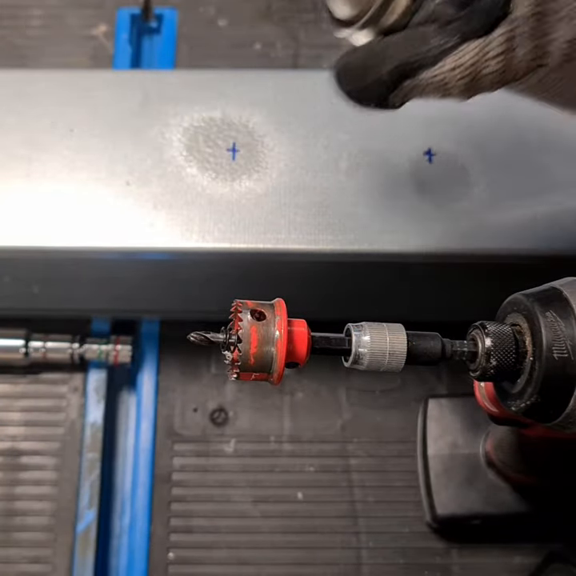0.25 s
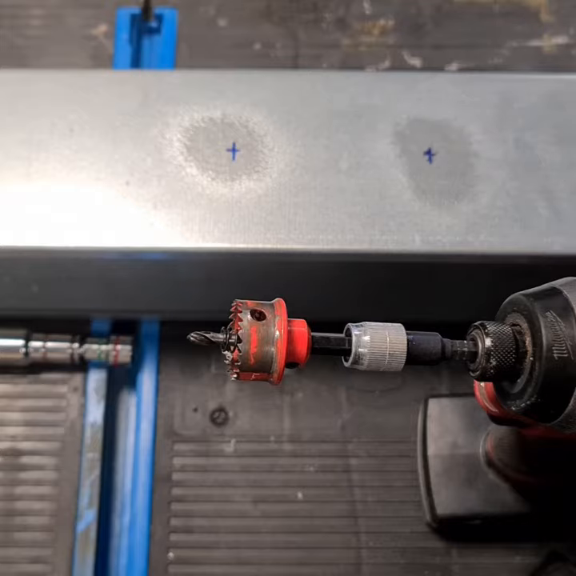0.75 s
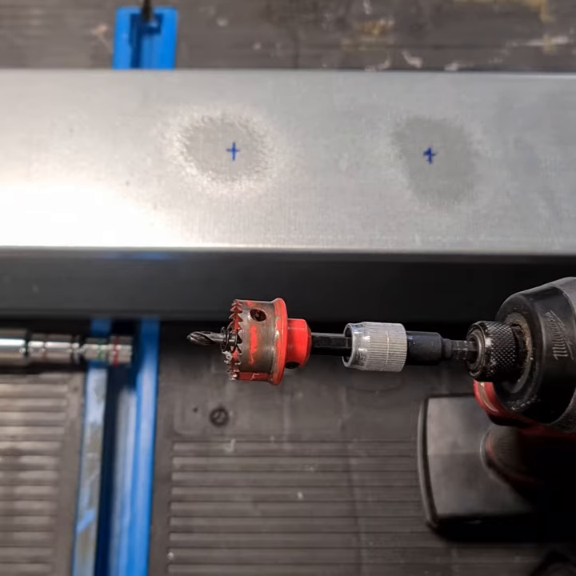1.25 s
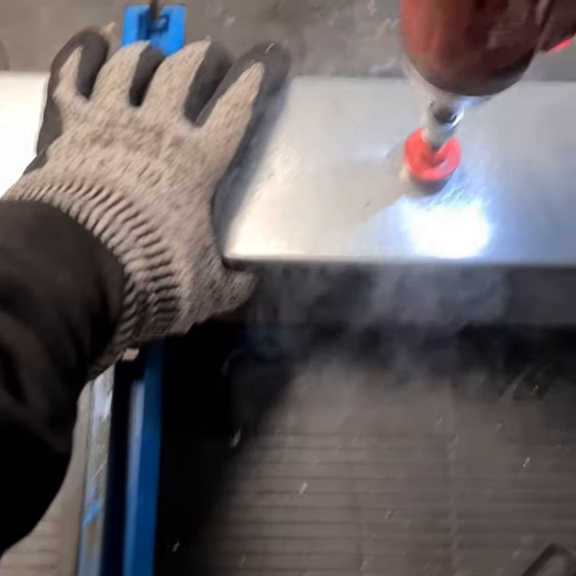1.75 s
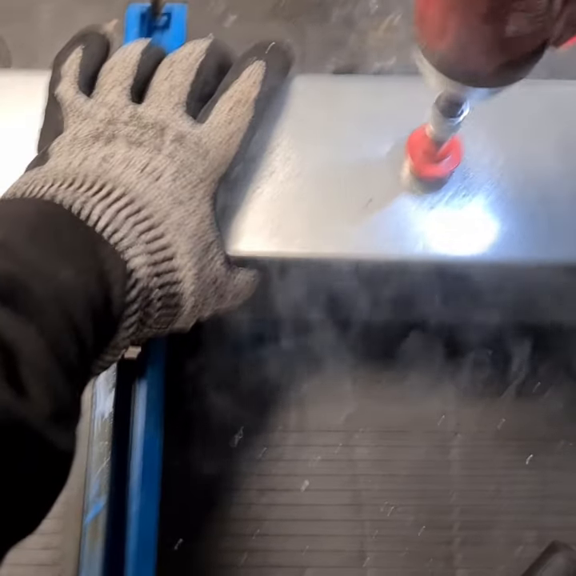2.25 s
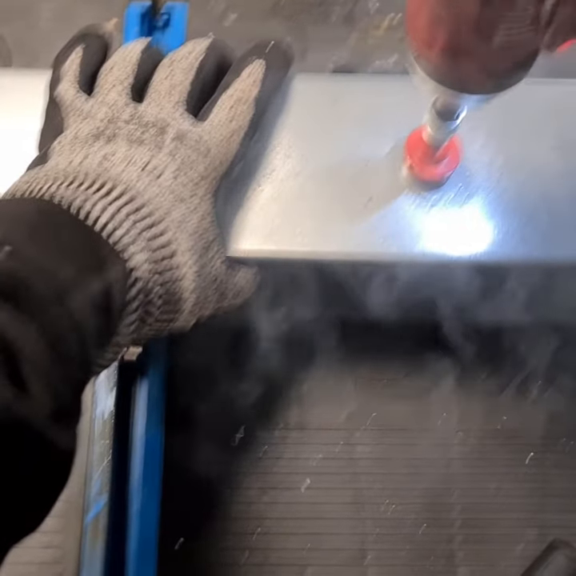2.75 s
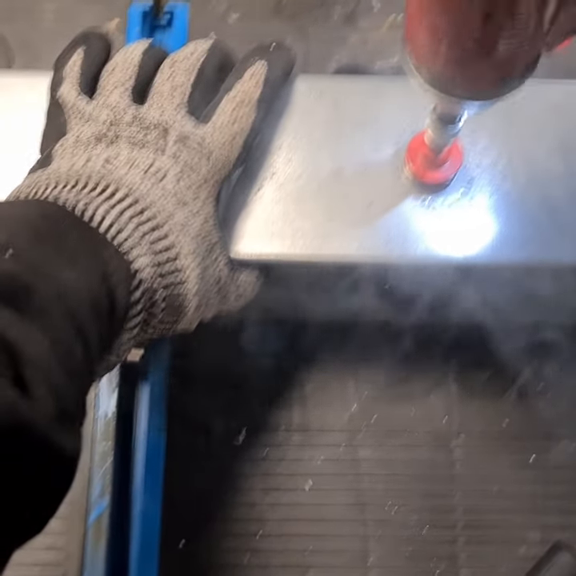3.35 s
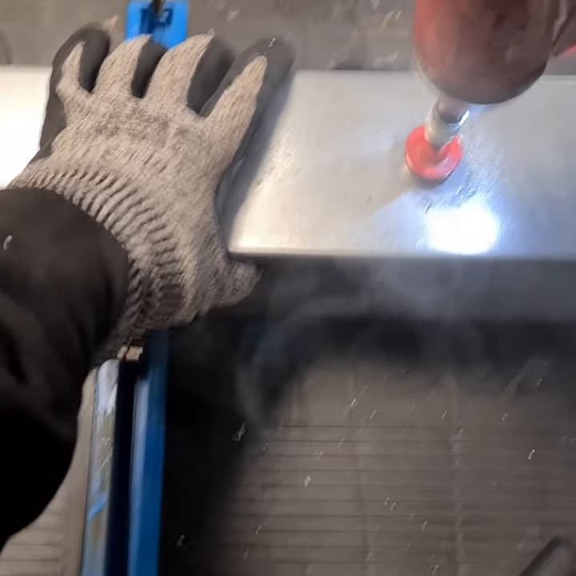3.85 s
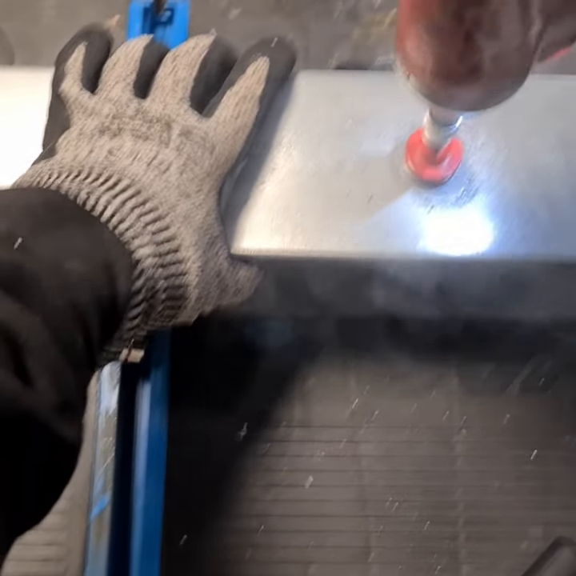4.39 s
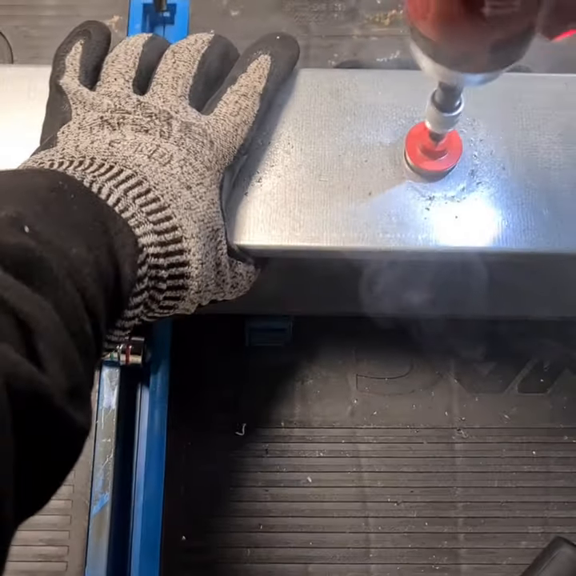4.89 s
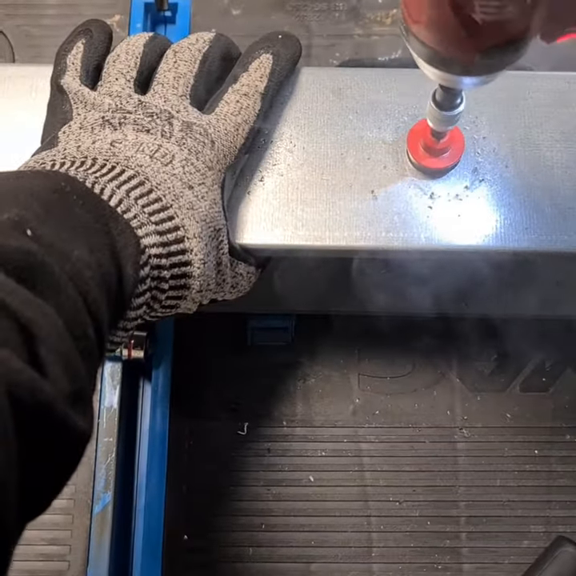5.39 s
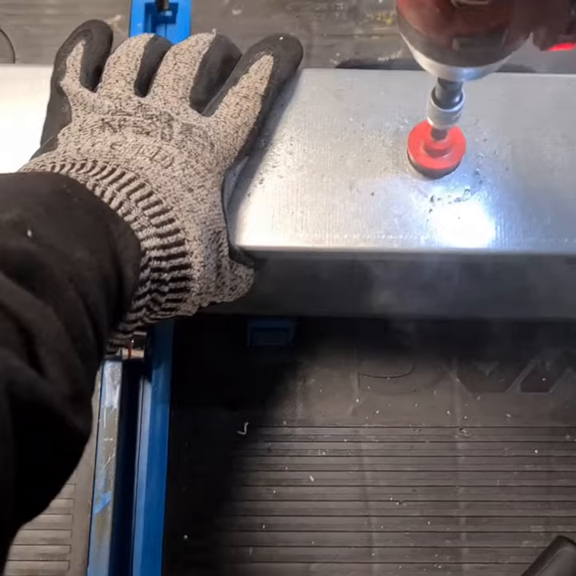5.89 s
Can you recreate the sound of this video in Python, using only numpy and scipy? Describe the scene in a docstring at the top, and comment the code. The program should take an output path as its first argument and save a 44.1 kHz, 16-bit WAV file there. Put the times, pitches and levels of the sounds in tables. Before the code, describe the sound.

A quiet workshop holds a soft low rumble and very faint hiss. From 0.1 to 0.25 seconds, then 0.65 to 0.8, a spray can gives two sharp, airy puffs, each setting thin steel shimmering briefly. Near-quiet follows, with a tiny bright rustle at 1.5. At about 1.73 an impact driver and hole saw burst in loudly: some fifty rattling blows a second, hollow steel booming, coarse scraping and piercing chip hiss. At 3.1 the brightest screech eases slightly while hammering continues. Around 4.72 the blows stop with a low thump, leaving rougher, uneven grinding with wavering metallic tones. The teeth lift briefly at 5.25, bite again, then lift longer from 5.6 to 5.8. Hammering returns at 5.8, slower, near forty blows a second, with strong scraping until the abrupt end at about 6.1. The microphone is close, with wide stereo.

```python
"""In a quiet workshop, two short puffs of cutting oil from a spray can land on steel trunking: jets of
shaped noise that set sharp resonances ringing. An impact driver then turns a hole saw in the sheet:
random tooth catches excite the wall modes, scrape and chips are dense coloured clicks, and the hammer
strikes some forty to fifty times a second in two runs, each blow a burst of band noise."""
import sys
import numpy as np
from scipy import signal
from scipy.fft import rfft, irfft, next_fast_len
from scipy.io import wavfile

SR = 44100
rng = np.random.default_rng(int(sys.argv[2]) if len(sys.argv) > 2 else 0)


def store_wav(level_fs):
    """Save 16-bit WAV to argv[1]."""
    pcm = np.round(np.clip(np.atleast_2d(level_fs), -1, 1) * 32767)
    wavfile.write(sys.argv[1], SR, pcm.T.astype(np.int16))


def invert_db(level):
    """Linear amplitude ratio for a level in decibels (20 dB per decade), elementwise."""
    return 10 ** (np.asarray(level, dtype=float) / 20)


N = 270333

# Stereo balance of most sources. Each row: frequency in Hz, left minus right in dB.
PAN = [(60, 3), (130, -4), (290, 1.5), (640, -5), (1410, 0), (3100, -2), (6820, 1), (15000, -8.5)]
# Two wall modes heard as tones. Each row: frequency in Hz, wavers a second.
SINGING_MODES = [(1030, 6), (1842, 14)]
EVEN_PAN = [(20, 0), (SR, 0)]


def rms_one(x):
    """Normalisation: scale to a root mean square of 1."""
    return x / np.sqrt(np.mean(x ** 2) + 1e-20)


def in_time(rows):
    """Linear interpolation: columns of a table against time, one value a sample."""
    s, *columns = np.transpose(rows)
    return [np.interp(np.arange(N) / SR, s, c) for c in columns]


def at_hz(points, hz):
    """Spectral interpolation along a logarithmic frequency axis."""
    hz_points, values = np.transpose(points)
    return np.interp(np.log(hz + 1), np.log(hz_points + 1), values)


def drift(rate):
    """Slow random modulation: low-passed noise of spread 1, drawn once in 40 samples."""
    r = np.exp(-80 * np.pi * rate / SR)
    noise = rng.standard_normal(N // 40 + 2002)
    slow = signal.lfilter([1], [1, -2 * r, r * r], noise)[2000:]
    return np.interp(np.arange(N) / 40, np.arange(len(slow)), rms_one(slow))


def resonate(x, hz, width_hz):
    """Damped resonance: two poles, gain 1 at the peak, narrower modes ringing longer."""
    r = np.exp(-np.pi * width_hz / SR)
    poles = [1, -2 * r * np.cos(2 * np.pi * hz / SR), r * r]
    return signal.lfilter([(1 - r * r) / 2, 0, (r * r - 1) / 2], poles, x)


def ring_modes(drive, modes):
    """Modal superposition: one force drives every mode, with alternating sign."""
    return sum(invert_db(db) * (-1) ** k * resonate(drive, hz, width_hz)
               for k, (hz, width_hz, db) in enumerate(modes))


def grains(per_s, spread_db):
    """Shot noise: clicks at random instants with uneven sizes, rms 1."""
    sizes = invert_db(spread_db * np.minimum(rng.exponential(1, N), 5)) * rng.choice([-1, 1], N)
    return rms_one(sizes * (rng.random(N) < per_s / SR) + 1e-9)


def spread(shared, apart, spectrum, pan):
    """Partial coherence: colour a source, place it, and share part of it between left and right."""
    # Each row: frequency in Hz, likeness of left and right (below 0 is taken as 0).
    likeness = [(60, 0.89), (130, 0.77), (290, 0.99), (640, 0.88), (1410, -0.15), (3100, 0.61),
                (6820, -0.01), (15000, -0.02)]
    left_lead_s = 4.5e-05
    size = next_fast_len(N)
    hz = np.arange(size // 2 + 1) * SR / size
    alike = np.clip(at_hz(likeness, hz), 0, 1)
    common = np.sqrt(1 + alike) * rfft(shared, size)
    opposed = np.sqrt(1 - alike) * rfft(apart, size) * [[1], [-1]]
    gain = invert_db(at_hz(spectrum, hz) + at_hz(pan, hz) * [[.5], [-.5]])
    lead = np.exp(2j * np.pi * hz * left_lead_s * [[1], [0]])
    return rms_one(irfft((common + opposed) * gain * lead, size)[:, :N])


def spread_noise(spectrum, pan):
    """Broadband noise: two independent draws coloured and placed in stereo, rms 1."""
    return spread(*rng.standard_normal((2, N)), spectrum, pan)


def workshop():
    """Background noise: a low rumble and faint hiss of random noise, with a few wavering sinusoids."""
    # Rumble. Each row: frequency in Hz, relative density in dB per Hz.
    room_tone = [(12, -30), (20, -7), (50, -8), (153, -8), (185, -18.5), (300, -22.5), (420, -31),
                 (900, -35), (3200, -37.5), (5100, -45), (15600, -56)]
    # Far machinery. Each row: frequency in Hz, mean level in dB.
    hum = [(70.0, -75), (107.7, -72), (150.7, -72), (296.1, -77)]
    rumble = invert_db(-65.5 + 1.2 * drift(2.8)) * spread_noise(room_tone, EVEN_PAN)
    hiss = invert_db(-84) * spread_noise([(2500, -30), (5000, 0), (11000, -1), (16000, -5)], EVEN_PAN)
    s = np.arange(N) / SR
    hums = sum(np.sqrt(2) * invert_db(db + 1.3 * drift(7)) * np.sin(2 * np.pi * hz * s) for hz, db in hum)
    return rumble + hiss + hums


def jet_level_db():
    """Valve envelope: each puff rises fast, sags, and drops steeply when the valve shuts."""
    # Each row: valve opens in seconds, valve shuts in seconds, jet level before rise and sag in dB.
    puffs = [(0.083, 0.251, -31), (0.643, 0.796, -30.5)]
    rise_s, sag_db_per_s, stop_db_per_s, floor_db = .013, 31, 470, -110
    level = np.full(N, float(floor_db))
    for opens, shuts, db in puffs:
        since = np.arange(N) / SR - opens
        rise = -60 * np.exp(-np.abs(since) / rise_s)
        stop = stop_db_per_s * np.maximum(since + opens - shuts, 0)
        puff = db + rise - sag_db_per_s * since - stop
        level = np.maximum(level, np.where(since > 0, puff, floor_db))
    return level


def spray():
    """Jet turbulence: smooth bright noise excites thin steel resonances and a short dull room tail."""
    # Each row: frequency in Hz, relative density in dB per Hz.
    jet_spectrum = [(150, -42), (250, -17), (353, -9), (508, -3), (931, -13), (1030, -5.5), (1340, -7.5),
                    (1680, 0.5), (2490, -12), (3350, -3), (4490, -9), (9130, -4), (11800, -2),
                    (13400, -4.5), (15600, -4)]
    # Each row: frequency in Hz, left minus right in dB.
    jet_pan = [(60, -1.5), (240, -7), (950, 2.5), (3770, -0.5), (15000, -2.5)]
    # Thin steel. Each row: frequency in Hz, relative level in dB, 60 dB decay in seconds before the cap.
    steel_ring = [(1028, -10, 0.66), (2100, -1, 0.39), (2460, 3, 0.64), (3095, -5, 1.8), (3316, -0.5, 0.85),
                  (3542, -7, 0.93), (3600, -5, 0.59), (4624, -8, 1.2), (5216, -14, 5.0), (5819, -6, 0.46),
                  (6062, -10, 0.8), (6702, -13, 0.91), (7660, -10, 5.0), (7946, -9, 0.33), (8533, -8, 0.34),
                  (8678, -23, 1.1), (9292, -18, 0.79), (9900, -16, 2.1), (10910, -19, 1.2),
                  (11080, -16, 0.68), (11250, -10, 0.28), (11770, -12, 0.46)]
    ring_db, decay_most_s, tail_db, tail_t60_s = 8, 1.3, -19, .5
    jet_db = jet_level_db()
    jet = invert_db(jet_db + 1.3 * drift(30)) * spread_noise(jet_spectrum, jet_pan)
    ring = 0
    for hz, db, t60 in steel_ring:
        width_hz = np.log(1000) / (np.pi * min(t60, decay_most_s))
        ring = ring + invert_db(db) * resonate(jet, hz, width_hz)
    # the jet energy feeds the tail and leaks away exponentially
    keep = invert_db(-120 / (tail_t60_s * SR))
    energy = signal.lfilter([1 - keep], [1, -keep], invert_db(2 * jet_db))
    tail_spectrum = [(300, -8), (1200, -8), (3500, 1), (8000, -5), (16000, -16)]
    tail = np.sqrt(energy) * spread_noise(tail_spectrum, jet_pan)
    return jet + invert_db(ring_db) * ring + invert_db(tail_db) * tail


def decaying_swell(s, db, t60, rise_s):
    """Exponential decay: a linear onset, then a fall of 60 dB in each t60."""
    since = np.arange(N) / SR - s
    return invert_db(db - 60 * np.maximum(since, 0) / t60) * np.clip(since / rise_s, 0, 1)


def tick():
    """Resonant noise: a faint bright rustle before the cut, with two broad spectral peaks."""
    # One row: start in seconds, level in dB, 60 dB decay in seconds.
    rustle = (1.512, -70, .3)
    white = rng.standard_normal((2, N))
    bright = resonate(white, 6100, 600) + resonate(white, 8000, 500) + .15 * white
    return decaying_swell(*rustle, .015) * rms_one(bright)


def level_db(layer):
    """Contact excitation: stage level plus a share of feed pressure, fading with the teeth off the steel."""
    # Each key: a layer; its values: share of the pressure swing, fade in dB per second off the steel,
    # level in dB in each of the four stages.
    layers = { "wide": (0.22, 124, [-23, -22, -19, -20]), "side": (0.69, 177, [-28.5, -26.5, -26.5, -27]),
              "scrape": (0.62, 190, [-25, -23, -26, -21.5]), "chips": (1.05, 260, [-23, -24.5, -31.5, -25]),
              "cup": (0.96, 410, [-23, -31, -32, -30]), "upper": (0.56, 200, [-29, -29.5, -32, -25.5]),
              "low tone": (0.3, 50, [-44.5, -42, -42.5, -44]),
              "high tone": (0.3, 103, [-41, -35.5, -42.5, -34.5]),
              "hammer": (0.3, 100, [-20.5, -21.5, -21.5, -19.5]), }
    # Times in seconds at which the layer levels step to a new stage at once.
    stages_s = [3.135, 4.718, 5.815]
    # Feed pressure. Each row: time in seconds, swing in dB before each layer takes its share.
    pressure = [(1.73, 1), (2.0, -2), (2.35, 0), (3.1, 1), (3.2, -2), (3.45, 0), (4.1, 0), (4.27, 1.5),
                (4.6, .5), (4.71, 2), (4.73, 2), (4.86, -1), (4.94, 4.5), (5.0, -6.5), (5.05, -2.5),
                (5.14, -3), (5.23, -2), (5.39, 1), (5.55, 5.5), (5.6, 0), (5.82, 5), (5.835, -1), (5.85, 2),
                (6.1, -1), (6.13, 1)]
    # Teeth off the steel. Each row: leave in seconds, touch again in seconds.
    lifts = [(5.25, 5.322), (5.594, 5.797)]
    fade_most_s, retouch_s = 0.14, 0.023   # the fade levels off; the teeth bite again
    share, fade_db_per_s, stages_db = layers[layer]
    s, (pressure_db,) = np.arange(N) / SR, in_time(pressure)
    off_s = sum(np.clip(s - leave, 0, fade_most_s) * np.clip(1 - (s - touch) / retouch_s, 0, 1)
                for leave, touch in lifts)
    stage_db = np.array(stages_db)[np.searchsorted(stages_s, s)]
    return stage_db + share * pressure_db - fade_db_per_s * off_s


def walls(modes, effort_db, per_s, spread_db):
    """Modal excitation: tooth catches drive all wall modes at once, and narrow modes ring on."""
    catches = [invert_db(effort_db) * grains(per_s, spread_db) for part in range(2)]
    rung = [ring_modes(c, modes) for c in catches]
    return spread(*rung, [(20, 0), (SR, 0)], PAN) * np.sqrt(np.mean(invert_db(2 * effort_db)))


def blow_samples():
    """Phase accumulation: a blow falls as the summed rate passes a whole number, a little uneven."""
    # Hammer runs. Each row of a run: time in seconds, blows a second.
    blow_rate = [
        [(1.7476, 42.88), (2.22, 49.15), (2.45, 47.87), (2.95, 54.38), (3.2, 53.07), (3.4, 49.21),
         (3.75, 48.38), (3.9, 48.7), (4.02, 46.46), (4.2, 53.6), (4.35, 53.8), (4.5, 52.82), (4.71, 52.8)],
        [(5.8165, 39.3), (6.127, 38.7)],
    ]
    jitter_s = 0.0005
    s, at = np.arange(N) / SR, []
    for run in blow_rate:
        running = (s >= run[0][0]) * (s <= run[-1][0])
        struck = np.cumsum(in_time(run)[0] * running) / SR
        at.append(np.flatnonzero(np.diff(np.ceil(struck))))
    at = np.concatenate(at)
    return (at + jitter_s * SR * rng.standard_normal(len(at))).astype(int)


def jolt_db(at):
    """Impulsive loading: each blow drives the teeth deeper, and the extra force dies exponentially."""
    rise_db, fade_s = 5, 0.0056
    clicks = np.zeros(N)
    clicks[at] = rise_db
    return signal.lfilter([1], [1, -np.exp(-1 / (fade_s * SR))], clicks + 1e-18)


def trunking(at, bite):
    """Plate resonance: catches and blows excite the wide walls and the side walls."""
    # Wide walls. Each row: frequency in Hz, width in Hz, relative level in dB.
    wide_modes = [(220, 13, -19), (271.1, 11.2, -11), (335.8, 16, -14.5), (347.8, 12.6, -11),
                  (409.4, 16.3, -1.5), (445.7, 16.5, -0.5), (465.5, 20.6, 1.5), (514, 10.2, -5),
                  (533.7, 9.1, -6)]
    # Side walls. Each row: frequency in Hz, width in Hz, relative level in dB.
    side_modes = [(601.4, 24, -0.5), (659, 26, 0), (687.6, 24, -1), (726.2, 15, 2), (812, 51, -9),
                  (940, 66, -10), (1057, 26, -6), (1222, 18.4, -1.5), (1258, 32, -5), (1380, 29, -13),
                  (1462, 20, -10)]
    # Wide walls. Each row: time in seconds, rise above their stage level in dB.
    boom = [(1.73, 2), (2.1, 0.5), (2.42, 0.5), (2.9, -2), (3.12, -1.5), (3.16, 2), (3.2, -2), (4.05, 2),
            (4.12, -4), (4.42, 3), (4.63, 0.5), (4.71, 4), (4.8, -3), (4.87, -4.5), (4.99, -3), (5.04, 4),
            (5.14, -2.5), (5.22, 0.5), (5.32, -1.5), (5.345, 6), (5.39, 3.5), (5.45, -3.5), (5.55, 1),
            (5.82, -0.5), (5.85, 5), (5.9, -0.5), (6.13, 1)]
    jolt = jolt_db(at)
    wide_db = level_db("wide") + in_time(boom)[0] + jolt + 0.42 * bite
    side_db = level_db("side") + jolt + 0.57 * bite
    return walls(wide_modes, wide_db, 900, 3.04) + walls(side_modes, side_db, 1500, 2.7)


def swells_db(mode):
    """Amplitude modulation: bell-shaped rises of the singing mode nearest each row."""
    # Each row: frequency in Hz, time of the peak in seconds, rise in dB.
    swells = [(1030, 2.7, 8), (1030, 2.93, 14.5), (1030, 3.17, 12), (1030, 3.95, 11), (1030, 4.61, 12),
              (1030, 4.83, 11.5), (1030, 5.12, 6), (1030, 5.37, 8), (1030, 5.53, 8), (1030, 5.77, 4),
              (1842, 2.86, 12), (1842, 3.3, 3), (1842, 4.3, 2), (1842, 4.07, 5), (1842, 4.67, 5),
              (1842, 5.12, 12), (1842, 5.26, 16), (1842, 5.5, 9.5), (1842, 6.5, 6), (1842, 6.01, 6.5)]
    width_s = 0.057
    s, modes_hz = np.arange(N) / SR, np.transpose(SINGING_MODES)[0]
    return sum(db * np.exp(-((s - at) / width_s) ** 2)
               for hz, at, db in swells if np.argmin(abs(modes_hz - hz)) == mode)


def singing():
    """Narrow-band vibration: two wall modes swell as wavering tones; higher modes follow the contact."""
    LONG_RING_HZ = 4   # width of the mode that rings longest
    # Higher wall modes. Each row: frequency in Hz, width in Hz, relative level in dB.
    upper = [(1890, 22, -5), (2160, 17, -2), (2255, 25, -9), (2400, 20.5, -2), (2545, 21, -7.5),
             (2530, 34, -5), (2868, 28, -9), (3384, 15, -6.5), (3506, LONG_RING_HZ, -8), (3580, 18, -8),
             (3780, 22, -9)]
    s, tones = np.arange(N) / SR, 0
    apart = np.array([[.6], [-.6]])   # phase of left and right in radians
    for k, layer in enumerate(["low tone", "high tone"]):
        hz, wavers = SINGING_MODES[k]
        swell = invert_db(level_db(layer) + swells_db(k) + 2.0 * drift(wavers))
        phase = 2 * np.pi * hz * s + 1.18 * drift(wavers) + apart
        tones = tones + np.sqrt(2) * swell * np.sin(phase)
    return tones + walls(upper, level_db("upper") + 0.73 * drift(25), 1200, 3.0)


def scrape():
    """Frictional shot noise: dense tooth clicks coloured towards the lower middle of the spectrum."""
    # Each row: frequency in Hz, relative density in dB per Hz.
    scrape_spectrum = [(82, -56), (140, -30.5), (223, -23), (456, -3.5), (571, -11), (674, -8),
                       (882, -16.5), (1240, -8.5), (1600, -26.5), (1810, -14), (2480, -12.5), (3050, -18.5),
                       (3940, -21.5), (5000, -26.5), (6500, -49), (11000, -120)]
    rub = spread(grains(3000, 3.37), grains(3000, 2.5), scrape_spectrum, PAN)
    return invert_db(level_db("scrape") + 1.83 * drift(14.2)) * rub


def chips(bite):
    """Granular noise: denser clicks of bright colour hiss as the teeth bite unevenly."""
    # Each row: frequency in Hz, relative density in dB per Hz.
    chip_spectrum = [(2350, -12), (4000, -1), (5050, -3.5), (6560, -0.5), (7230, -5.5), (7790, -2.5),
                     (8480, -5.5), (9080, -1), (9890, -7.5), (11700, -5), (15600, -11.5)]
    hiss = spread(grains(6000, 3.3), grains(6000, 2.3), chip_spectrum, PAN)
    return invert_db(level_db("chips") + .9 * bite + 0.7 * drift(12.0)) * hiss


def cup_screech(bite):
    """Friction-driven resonance: chips and teeth rub the saw cup into a bright screech."""
    # Saw cup and arbor. Each row: frequency in Hz, width in Hz, relative level in dB.
    cup = [(10830, 340, 2.5), (11260, 270, -3), (11460, 470, 2.5), (12900, 300, -6), (13100, 300, -7),
           (13600, 430, 0), (14800, 300, 1), (15300, 500, -4)]
    rung = [ring_modes(grains(9000, 2.5), cup) for part in range(2)]
    screech = spread(*rung, [(8500, -20), (10200, 0), (SR, 0)], PAN)
    return invert_db(level_db("cup") + 1.4 * bite + 0.63 * drift(8.6)) * screech


def hammer(at):
    """Impact radiation: each blow is a short noise burst through the saw cup, uneven by band."""
    hiss = spread_noise([(1500, -2.5), (9000, 0.5), (11500, 2.0), (16000, 0.13)], PAN)
    strength_db, out = level_db("hammer"), 0
    chance = np.clip(rng.standard_normal((len(at), 5)), -2, 2)
    # Each row: low edge in Hz, high edge in Hz, relative level in dB, 60 dB decay in seconds.
    bands = [(1570, 5000, 10.1, 0.033), (4570, 8730, 7.1, 0.023),
             (9400, 12360, 11.8, 0.022), (13480, 13700, 15, 0.026)]
    for k, (low_hz, high_hz, db, t60) in enumerate(bands):
        clicks = np.zeros(N)
        # one chance for the whole blow, one for its band
        clicks[at] = invert_db(strength_db[at] + db + 2.2 * chance[:, 4] + 2.2 * chance[:, k])
        dying = signal.lfilter([1], [1, -invert_db(-60 / (t60 * SR))], clicks + 1e-18)
        band = signal.butter(2, [low_hz, high_hz], "band", fs=SR, output="sos")
        out = out + dying * signal.sosfilt(band, hiss)
    return out


def bench(at):
    """Forced resonance: the bench booms as the blow rate or its double meets a mode, over a dull shake."""
    # Bench shaking. Each row: time in seconds, level in dB common to boom and shake.
    shaking = [(1.73, -36.5), (2.15, -49.5), (2.32, -43.5), (2.83, -45.5), (3.11, -41), (3.19, -50),
               (3.37, -43.5), (4.09, -45), (4.33, -41.5), (4.58, -44), (4.74, -37), (4.94, -54),
               (5.14, -53), (5.21, -40), (5.38, -41), (5.48, -49), (5.61, -41), (5.76, -55), (6.13, -45)]
    (bench_db,), clicks = in_time(shaking), np.zeros(N)
    clicks[at] = invert_db(1.5 * rng.standard_normal(len(at)))
    soft = signal.sosfilt(signal.butter(2, 110, fs=SR, output="sos"), clicks + 1e-18)
    boom = rms_one(resonate(soft, 55.0, 4.0) + invert_db(5.5) * resonate(soft, 88.7, 6.6))
    shake = spread_noise([(20, -24), (38, -22), (50, -1.5), (100, 2), (135, -12), (300, -35)], PAN)
    return invert_db(bench_db) * (invert_db(-5.5) * boom + invert_db(-2.5) * shake)


def lurch():
    """Transient decay: the work shifts once on the bench with a low thump of band-limited noise."""
    # One row: start in seconds, level in dB, 60 dB decay in seconds.
    thump = (4.725, -24.5, 0.32)
    band = signal.butter(2, [75, 300], "band", fs=SR, output="sos")
    return decaying_swell(*thump, 0.0099) * rms_one(signal.sosfilt(band, rng.standard_normal(N)))


def saw():
    """Superposition: walls, scrape, chips, cup, hammer and bench are summed from the start of the cut."""
    start_s = 1.7262
    bite, at = drift(19.4), blow_samples()   # uneven bite shared by several layers
    steel = trunking(at, bite) + singing()
    teeth = scrape() + chips(bite) + cup_screech(bite)
    driver = hammer(at) + bench(at) + lurch()
    return (steel + teeth + driver) * (np.arange(N) >= start_s * SR)


def scene():
    """Superposition of the spray, the rustle and the saw over the room tone."""
    return spray() + tick() + saw() + workshop()


def top_cut(x):
    """Nothing passes above the cut-off."""
    return signal.sosfilt(signal.butter(12, 17000, fs=SR, output="sos"), x)


def record(dry):
    """Saturation and low-pass filtering: peaks are rounded, then the top is cut steeply at 15750 Hz."""
    rounded = 1.25 * np.tanh(dry / 1.143)
    steep = signal.ellip(12, .3, 70, 15750, fs=SR, output="sos")
    mix = signal.sosfilt(steep, rounded)
    return top_cut(mix)


dry = scene()
out = record(dry)
store_wav(out)
```